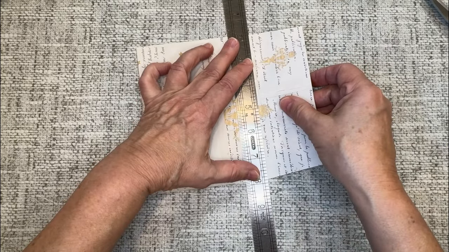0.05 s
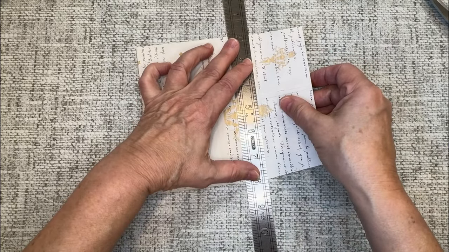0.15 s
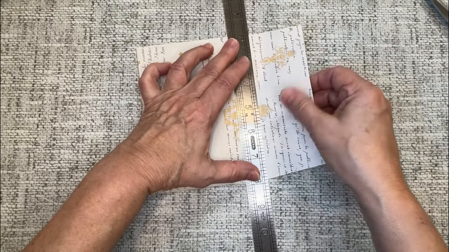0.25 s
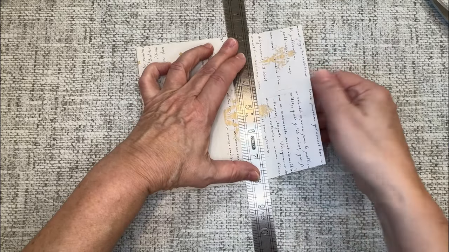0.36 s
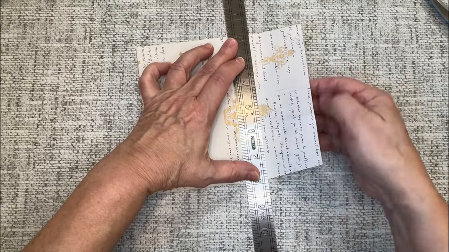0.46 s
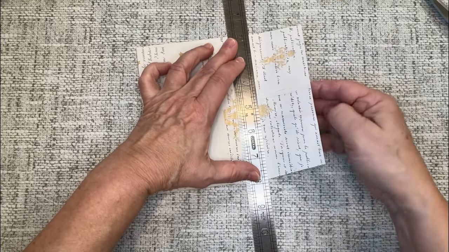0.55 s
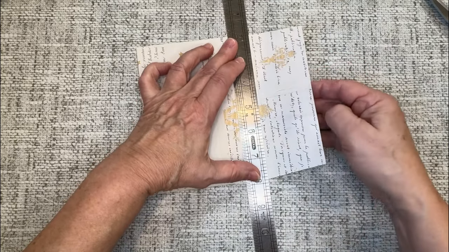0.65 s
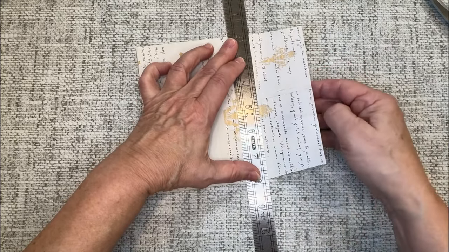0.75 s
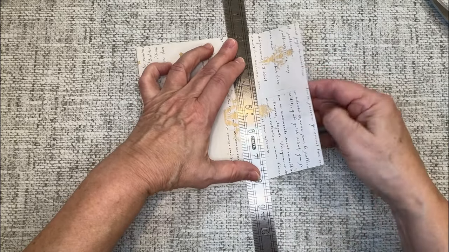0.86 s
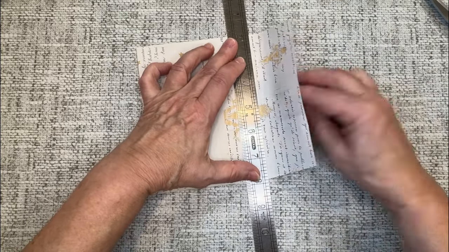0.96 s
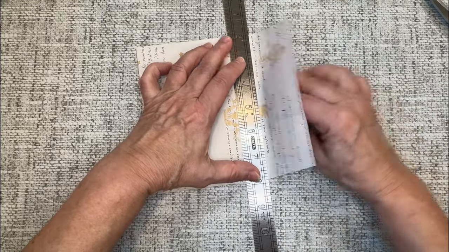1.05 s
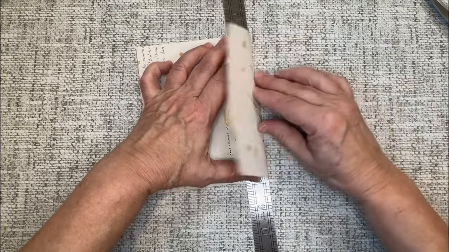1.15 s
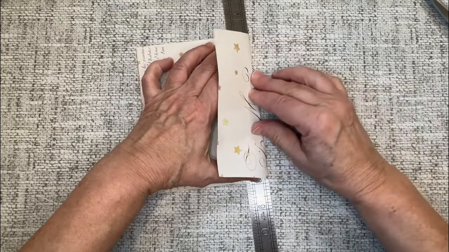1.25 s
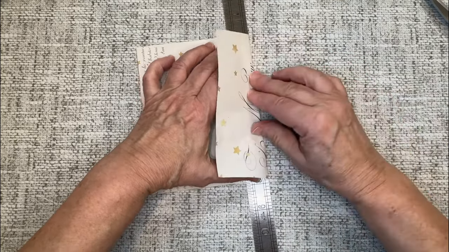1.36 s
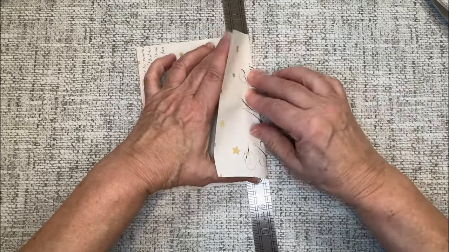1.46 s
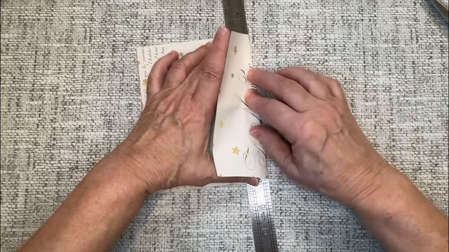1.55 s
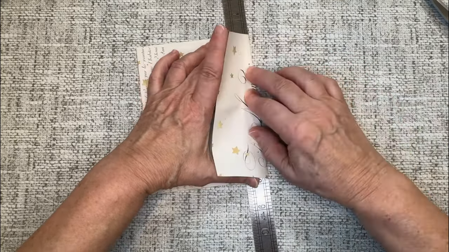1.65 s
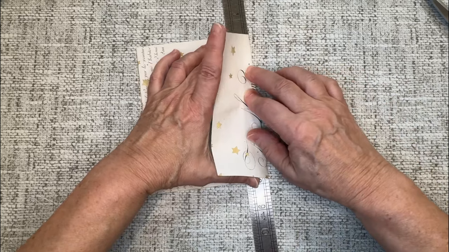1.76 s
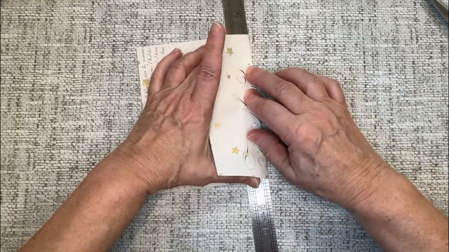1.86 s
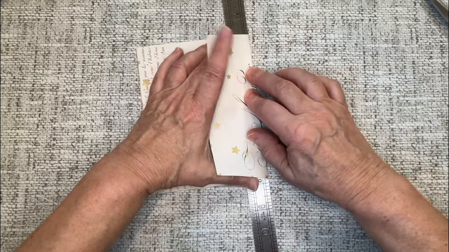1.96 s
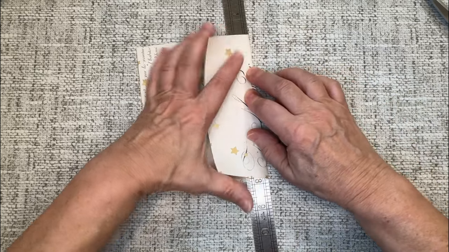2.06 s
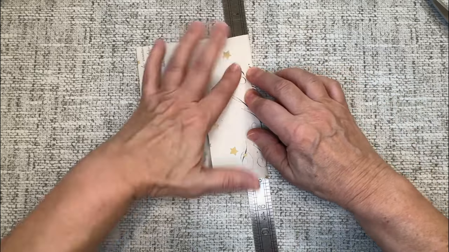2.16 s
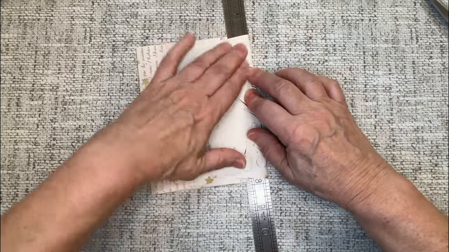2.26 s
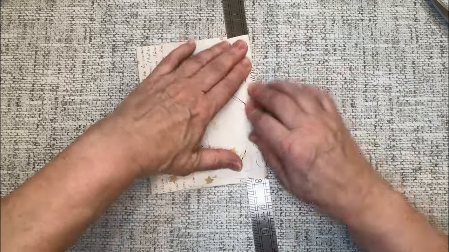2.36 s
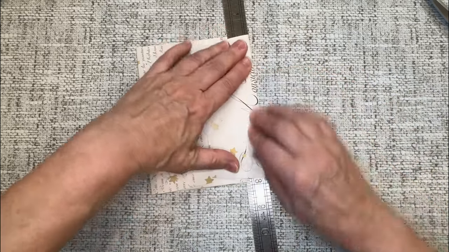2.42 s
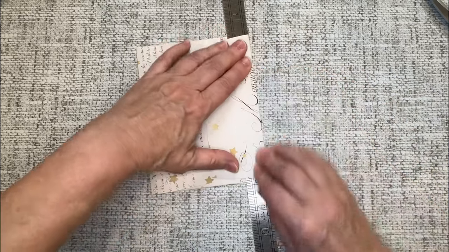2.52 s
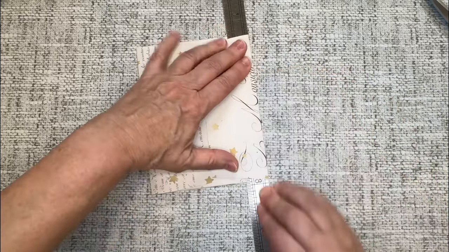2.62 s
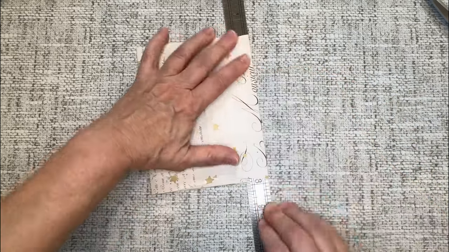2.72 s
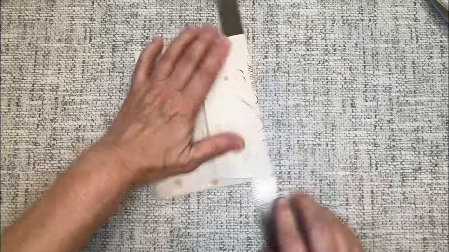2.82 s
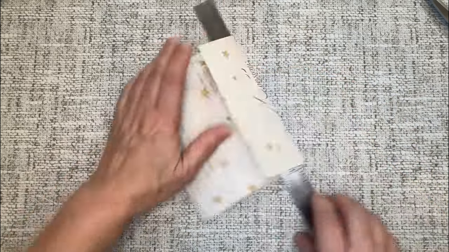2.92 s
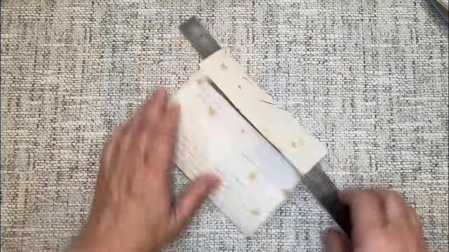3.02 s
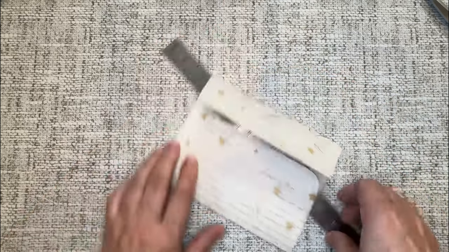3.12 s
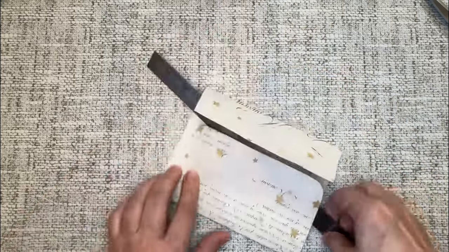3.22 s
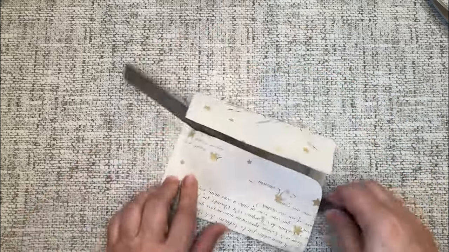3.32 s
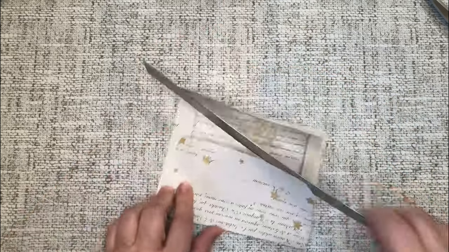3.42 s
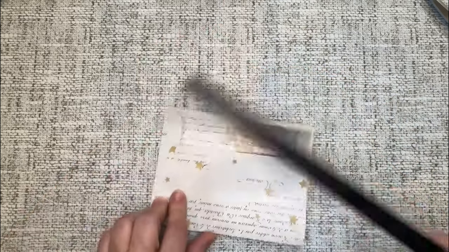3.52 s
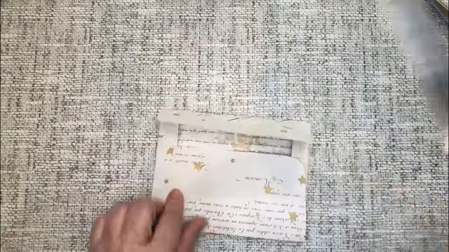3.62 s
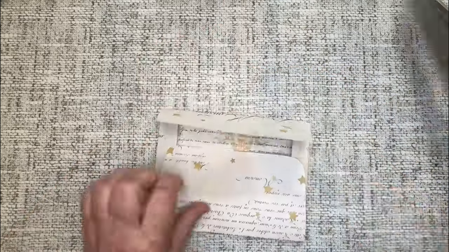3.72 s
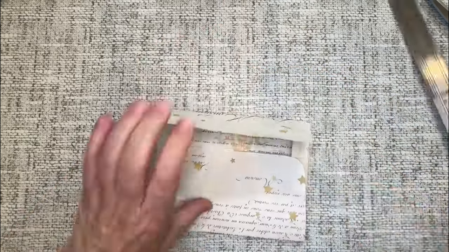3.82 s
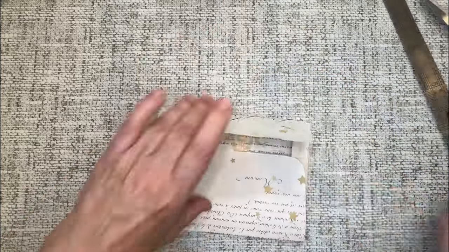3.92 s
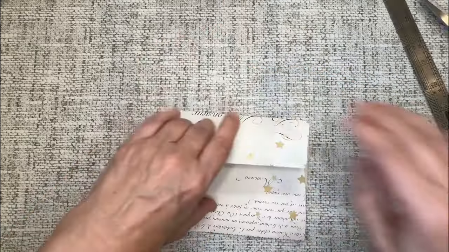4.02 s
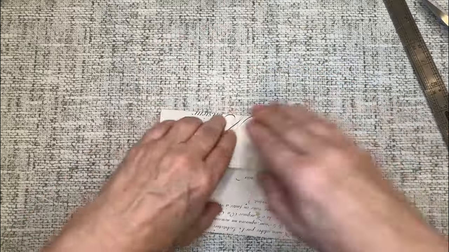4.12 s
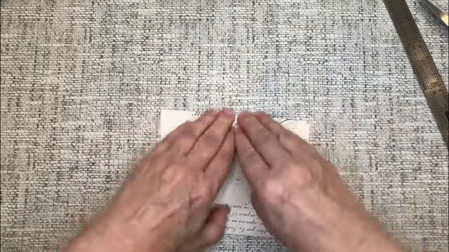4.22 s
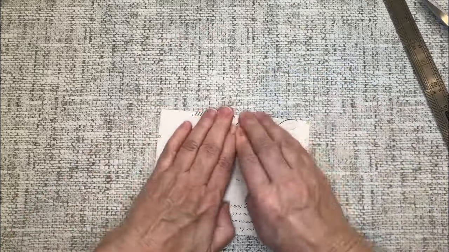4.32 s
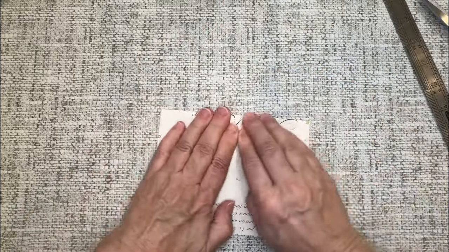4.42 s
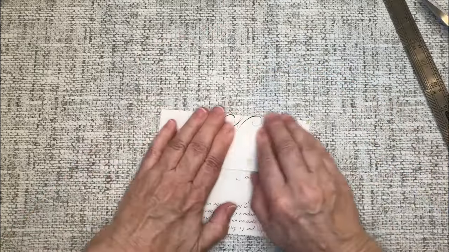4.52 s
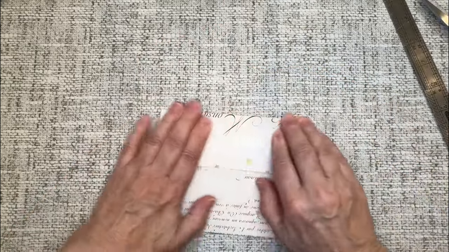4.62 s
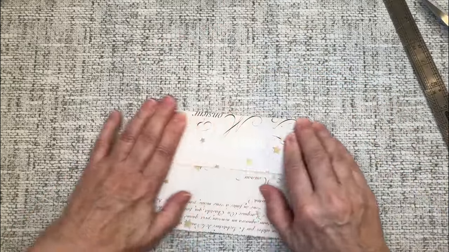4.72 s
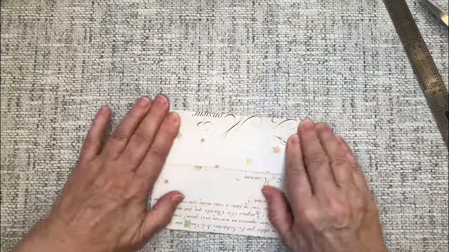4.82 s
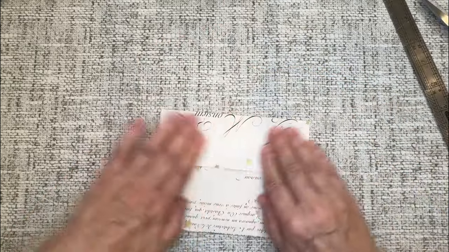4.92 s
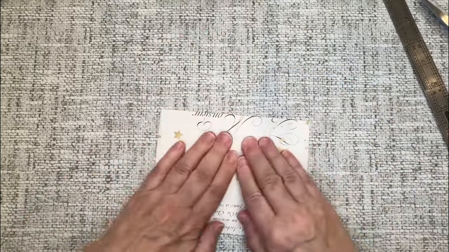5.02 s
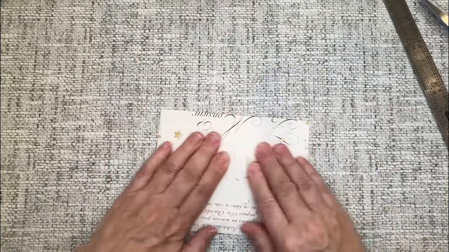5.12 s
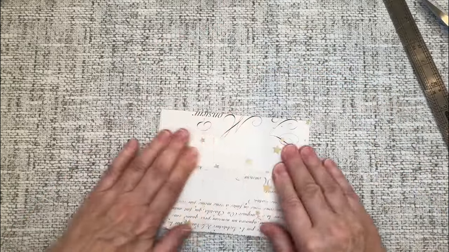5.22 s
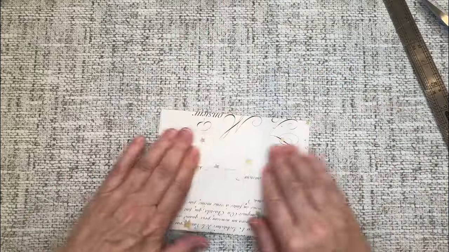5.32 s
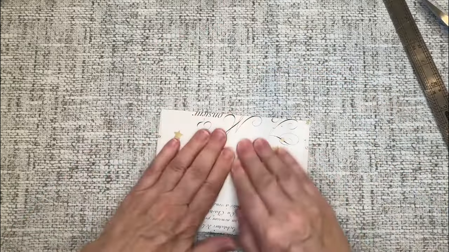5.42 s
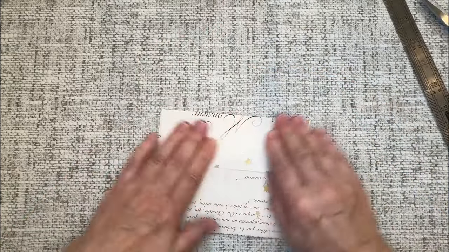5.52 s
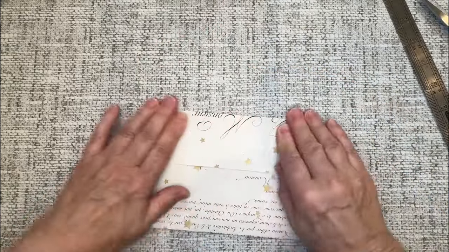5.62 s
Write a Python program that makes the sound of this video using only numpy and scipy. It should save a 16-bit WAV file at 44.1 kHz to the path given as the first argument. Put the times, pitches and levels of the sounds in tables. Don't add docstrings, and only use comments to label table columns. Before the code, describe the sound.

Stiff paper is folded and creased by hand on a cloth-covered table, with crisp snaps, then a metal ruler clatters down and smoothing follows.

```python
import sys
import numpy as np
from scipy import signal
from scipy.fft import rfft, irfft, next_fast_len
from scipy.io import wavfile
from scipy.ndimage import uniform_filter1d

SR = 44100
rng = np.random.default_rng(int(sys.argv[2]) if len(sys.argv) > 2 else 0)


def transcribe(signal):
    frames = np.atleast_2d(signal).T
    limited = np.clip(frames, -1, 1)
    pcm = np.round(limited * 32767).astype(np.int16)
    wavfile.write(sys.argv[1], SR, pcm)


def invert_db(level):
    return 10 ** (np.asarray(level, dtype=float) / 20)


N = 250207

# [peak t/s, skin hiss level/dB, rise t/s, fall t/s, paper surface over hiss level/dB]
FINGER_STROKES = [(.2, -54.5, 0.016, 0.26, -2.5), (.42, -55.5, 0.15, 0.23, -0.5),
                  (0.574, -61.5, 0.23, 0.06, 3), (.84, -66, 0.071, 0.044, 2),
                  (.979, -43, 0.063, 0.089, -1.5), (1.07, -47, 0.59, 0.068, -6),
                  (1.19, -56.5, 0.18, 0.045, -1), (1.385, -43.5, 0.028, 0.24, -14.5),
                  (1.449, -41, 0.12, 0.074, -5), (1.53, -75, 0.13, 0.14, -13),
                  (1.6, -58, 0.054, 0.044, 0.5), (1.731, -49, 0.11, 0.15, -8.5),
                  (1.823, -31.5, 0.017, 0.018, -14), (1.952, -47.5, .02, 0.098, -7),
                  (2.08, -39, 0.13, 0.02, -13), (2.229, -40.5, 0.0063, 0.061, -11),
                  (2.4, -48.5, 0.15, 0.51, -14.5), (2.772, -49.5, 0.46, 0.7, -12),
                  (2.849, -47, 0.14, 0.41, -3), (3.055, -40.5, 0.05, 0.23, -5), (3.1, -44.5, .1, 0.1, 3),
                     (3.14, -42.5, 0.099, 0.056, 2), (3.253, -45.5, 0.026, 0.073, -2.5),
                     (3.29, -48.5, 0.079, 0.19, -2), (3.459, -49, 0.26, 0.12, 1),
                     (3.67, -57.5, 0.0088, 0.16, -1), (3.898, -26, 0.023, 0.033, -4),
                     (3.93, -46, 0.094, 0.12, 1), (4.168, -53, 0.13, 0.35, 0),
                     (4.58, -45, 0.24, 0.53, -11.5), (4.708, -53, 0.13, 0.65, -2.5),
                     (4.878, -43, 0.014, 0.19, -24), (4.977, -39.5, 0.14, 0.066, -5.5),
                     (5.181, -47.5, 0.25, 0.18, -5), (5.37, -43, 0.082, 0.13, -16),
                     (5.52, -43.5, 0.29, 0.41, -10)]
# [peak t/s, flexing level/dB, rise t/s, fall t/s, table drag over flexing level/dB]
BENDS = [(0.2, -53.5, 0.023, 0.2, -18), (.56, -64, 0.38, 1.7, -10), (.83, -67, 0.45, 0.98, -21),
         (.979, -61, 0.17, 1.1, -33), (1.07, -53, 0.078, 0.079, -1), (1.22, -51, 0.051, 0.16, -0.5),
         (1.442, -46, 0.23, 0.17, -4.5), (1.732, -53, 0.56, 0.19, -7), (1.82, -41.5, 0.01, 0.1, -39),
         (2.084, -50.5, 0.25, 0.36, -28), (2.23, -70.5, 0.026, 0.22, 13.5), (2.7, -63, 2, 0.48, -4.5),
         (2.847, -55, 0.067, 3.1, -7.5), (3.09, -52, 0.25, 0.059, -7), (3.29, -52.5, 0.34, 0.57, -35),
         (3.483, -44.5, 0.058, 0.079, -21), (3.568, -66, 0.41, 0.058, 11.5), (3.68, -60.5, 0.041, 0.32, -9),
         (3.9, -42.5, 0.034, 0.18, -4.5), (4.2, -53.5, 0.11, 0.19, -4), (4.6, -64.5, .5, 0.5, -24),
         (4.962, -53.5, 0.063, 0.18, -11.5), (5.178, -64.5, 0.2, 0.36, -44), (5.46, -56.5, 0.07, 0.23, -16),
         (5.53, -59.5, 0.29, 4.4, -2.5)]
# [still from t/s, until t/s, depth level/dB]
PAUSES = [(0.633, 0.777, -26), (1.65, 1.67, -5.5), (1.877, 1.924, -3.5), (2.16, 2.196, -18),
          (4.798, 4.84, -20), (5.035, 5.035, -8), (5.26, 5.284, -9)]
# [f/Hz, level/dB]
HISS_COLOUR = [(6000, -11), (7400, -9), (8200, -5.5), (9500, -1.5), (11000, -1.5), (12000, -0.5),
               (12900, -2), (13500, -14), (14600, -5), (15600, -13), (16000, -69.5)]
# [f/Hz, level/dB]
SURFACE_COLOUR = [(2200, -17.5), (3100, -5.5), (4300, 1.5), (5300, 0), (6000, 0), (7200, -3.5), (8500, -10)]
# [f/Hz, level/dB]
SHEET_COLOUR = [(700, -17.5), (1080, -8), (1350, -5.5), (1600, -1.5), (1950, -2), (2450, -3.5), (2800, -2),
                (3300, -4.5), (4500, -21)]
# [f/Hz, level/dB]
DRAG_COLOUR = [(80, -24.5), (160, -10.5), (300, 2), (550, -0.5), (900, 0.5), (1400, -2)]
BEND_SURFACE_DB = -5.5
SINK_S, RESUME_S = 0.05, 0.036
PATCHY_DB, PATCH_RATE = 2.0, 11

# [peak t/s, level/dB, rise
# t/s, fall t/s, pitch f/Hz]
AIR_POCKETS = [(.776, -58, 0.0067, 0.022, 1160), (.86, -63.5, .08, .04, 2250), (.85, -57, .08, 0.046, 3900),
               (.93, -56.5, 0.041, 0.12, 2050), (.96, -55, .08, .06, 4400), (.98, -60, .1, .08, 6500),
               (1.05, -46, 0.11, 0.098, 4250), (1.06, -54.5, 0.12, 0.07, 1650),
               (1.195, -56, .1, 0.045, 2660), (1.5, -50.5, 0.11, 0.25, 2420),
               (1.56, -58.5, .15, 0.16, 1350), (1.72, -53.5, .12, 0.16, 1360),
               (1.72, -52.5, 0.092, 0.18, 2580), (1.86, -52.5, .04, 0.12, 1300),
               (2.1, -52, 0.024, 0.12, 1330), (3.13, -54, .12, .06, 4820), (3.31, -49.5, .1, .08, 2300),
               (3.915, -51, .03, 0.049, 293), (4.33, -58.5, .05, 0.076, 1390),
               (4.435, -60, .008, 0.018, 1200), (4.88, -69, 0.0071, .02, 746),
               (4.965, -60.5, .06, 0.07, 2300), (5.5, -59.5, .15, .3, 1900), (5.17, -67, .15, 0.094, 4300),
               (1.185, -53, .02, 0.033, 555), (1.345, -42, 0.0067, .018, 570),
               (1.396, -45, .005, .015, 2770), (1.71, -56, .01, .03, 404), (2.13, -61, 0.059, 0.086, 398),
               (3.201, -50, .005, .01, 2200), (3.755, -55, .01, 0.065, 820), (5.332, -44, .006, .008, 5060),
               (5.379, -47, .005, .04, 1730)]
POCKET_WIDTH = 0.17

# [t/s, peak level/dB, bright part level/dB, ring f/Hz, relative length]
BUCKLES = [(.189, -49, -2, 2200, 1.3), (.953, -40, 1, 4350, 0.86), (.985, -32, -19, 1960, 0.47),
           (.9906, -26.5, -9, 2300, 0.69), (1.043, -35, -15, 3380, 0.94), (1.2143, -11.5, -6, 2760, 0.7),
           (1.3425, -23.5, -25, 1490, 1.34), (1.346, -23, -30, 1260, 0.75), (1.3945, -26, -12.5, 1350, 0.7),
           (1.4466, -15, -14, 2430, 1.1), (1.7993, -41.5, -11, 1300, 1), (1.8243, -22, -1.3, 2700, 1.42),
           (1.831, -22, -15, 2200, 0.7), (2.0325, -31.5, 0, 2150, 0.73), (2.225, -35.5, -6, 2010, 0.96),
           (2.237, -36, -12, 995, 1.2), (2.317, -61, -8, 1150, 0.76), (2.808, -44.5, 1, 2680, 2.1),
           (2.842, -37.5, -6, 2770, 0.9), (3.028, -39, -3, 2360, 0.98), (3.042, -30, -4.5, 1760, 1.24),
           (3.075, -35, -8, 2520, 1), (3.2, -31, -9, 2370, 0.37), (3.234, -45, -4, 5900, .7),
           (3.257, -37.5, -2, 1920, 1.2), (3.296, -37, 1, 1980, 1.6), (3.493, -28.5, -21, 2230, 1.15),
           (3.4975, -31, -27, 1930, 1.1), (3.503, -31, -25, 1620, 1.1), (3.669, -48.5, 1, 1480, 1),
           (4.18, -32.5, -11, 2900, 2.8), (4.189, -25.5, -4, 1237, 1.08), (4.864, -55, 4, 3000, 0.89),
           (5.33, -43.5, 14.5, 4900, 1.4), (5.333, -38.5, 16.5, 3000, 0.71), (5.3787, -33, 2.5, 3200, 0.5)]
FINGER_TAPS = [(.774, -48.5, -41, 600, 1.1), (1.71, -37, -25, 407, 1.6), (2.077, -26, -2, 1923, 1.2),
               (2.212, -47, 3, 895, 0.79), (2.43, -44, -22, 680, 0.59), (2.697, -40, -6.5, 1890, 1.03),
               (2.929, -37.5, -5, 635, 1.4), (3.37, -41.5, -1, 1880, 1.8), (3.454, -37, -18, 374, 0.61),
               (3.47, -47, -17, 690, 1), (3.523, -27.5, -18, 475, 1.35), (3.535, -38, -21, 930, 0.61),
               (3.55, -59, -21, 500, 1.1), (3.905, -29.5, -33.5, 333, 2), (3.98, -37.5, -30, 337, 1),
               (3.995, -37, -30, 650, 1.15), (4.1, -44.5, -14, 610, 2.5), (4.009, -37.5, 3.5, 1630, 1.5),
               (5.517, -34, -14, 1330, .45)]
# [f/Hz, level/dB]
SNAP_COLOUR = [(500, -5), (1050, -1.5), (1300, 5), (1650, 3), (2000, 3), (2400, 4), (3000, 3), (4300, -1),
               (6000, -15.5)]
# [f/Hz, level/dB]
CRACK_COLOUR = [(3500, -7), (5000, 3), (8000, -2.5), (12000, -3), (15600, -28), (16500, -92.5)]
# [f/Hz, level/dB]
PUSH_COLOUR = [(120, -22.5), (210, -4), (290, -14.5), (420, 0), (580, -1.5), (800, -3), (1200, -15)]
SNAP_PUSH_DB, SNAP_T60_S = -24, 0.025
TAP_PUSH_DB, TAP_T60_S = -14, 0.029
LEAD_S = .012

# [t/s, peak level/dB, crack level/dB, clack level/dB]
RULER_BLOWS = [(3.7459, -20, -7, -3.5), (3.758, -35.5, -32, -4), (3.7974, -30, -8.5, -2),
               (3.8644, -25, -10, 0.5), (3.8685, -26, -4, -4), (3.872, -19, -33, -18),
               (3.878, -25, -33, -1), (3.8813, -19, -33, -9), (3.8875, -30, -28, 0),
               (3.8939, -17.5, -1.5, -12), (3.8977, -16.5, -19, -10), (3.9, -20.5, -9, -10),
               (3.9055, -18.5, -4.5, -16), (3.9098, -19, -25, -5), (3.9133, -25, -18, -15),
               (3.921, -32, -25, -11), (3.928, -37, -22, 5)]
# [f/Hz, level/dB, t60 t/s]
RULER_MODES = [(1250, -6, .2), (1340, -6, .2), (1470, -8, .15), (1538, -7, .25), (1670, -14, .16),
               (1770, -5, .16), (1842, -9, .2), (2165, -16, .2), (5674, -4, .16), (5717, -4, .2),
               (5798, 0, .25), (5885, -2, .28), (6045, -5, .22), (6171, -9, .2), (6350, -6, .27),
               (6388, -5, .2), (6616, -11, .19), (6794, -11, .25), (6940, -9, .14), (7095, -11, .2),
               (7435, -12, .2)]
# [f/Hz, level/dB]
CLACK_COLOUR = [(700, -14), (1150, -7.5), (1500, -1), (1850, 0.5), (2300, -1.5), (3500, -8)]
RATTLE_T60_S = 0.015

# [t/s, peak level/dB, pitch f/Hz]
LANDINGS = [(0.208, -57, 75.4), (1.063, -68, 68), (1.11, -57, 111), (1.205, -65, 64), (1.343, -50, 201),
            (1.442, -54, 127), (1.83, -61, 105), (2.073, -60, 104), (2.249, -56, 69), (2.691, -51.5, 190),
            (2.79, -55, 126), (2.922, -57, 124), (3.116, -59, 64.6), (3.748, -65, 131), (3.8, -71, 151),
            (3.869, -59, 129), (3.898, -48.5, 108.5), (3.905, -44.5, 183), (4.99, -66, 75), (5.38, -68, 80)]
THUD_T60_S = 0.14

# [f/Hz, level/dB]
ROOM_COLOUR = [(100, -0.5), (1500, 13), (3000, 8), (7000, 10), (9000, 1), (16000, -41)]
ROOM_T60_S, ROOM_GAP_S, ROOM_DB = .3, 0.0095, -14.5

# [peak t/s, level/dB, rise t/s, fall t/s]
ARM_LEANS = [(.27, -69.5, 0.73, 1.9), (1.07, -60.5, 0.13, 0.5), (1.48, -62, 1.1, 0.083),
             (1.72, -67.5, 0.4, 0.19), (1.9, -75, .15, 0.16), (2.09, -73, 0.085, 0.13),
             (2.26, -65, 0.038, 0.25), (2.78, -62.5, 0.14, 0.26), (3.14, -64, 1, 1),
             (3.93, -55.5, 0.052, 0.079), (4.22, -73, 0.12, 0.5), (4.5, -75, .1, 0.39),
             (4.99, -75, 0.25, 0.53), (5.37, -68, 0.03, 0.14)]
# [f/Hz, level/dB]
TABLE_COLOUR = [(25, -31.5), (45, -16.5), (60, 1.5), (90, -10.5), (120, -4), (155, -10), (200, -5.5),
                (260, -11.5)]
# [f/Hz, level per Hz/dB]
VENT_COLOUR = [(82, -34), (140, -4), (355, -5.5), (595, -18), (1150, -4.5), (2290, -13), (3600, -17.5),
               (6960, -29), (12600, -46), (15700, -52), (16100, -70)]
# [f/Hz, level/dB]
MAINS_LINES = [(60, -94.5), (120, -86.5)]
VENT_DB = -75

# [f/Hz, likeness 0-1, right leads by/radians, left minus right level/dB]
PORTS = [(30, .68, 0, 4), (90, .45, 0, 0), (250, .55, 0, 3), (700, .2, -.3, 2), (1700, .2, -.4, 0),
         (2400, .7, -.7, 0), (3100, .88, -2.8, 0), (4200, .89, -3.14, 0), (5200, .7, -2.9, 0),
         (5700, .3, -4, 0), (7000, .3, -3.58, 1), (7800, .88, -3.28, 0), (8600, .995, -3.14, 0),
         (9700, .992, -3.08, 0), (10600, .975, -2.95, 0), (11300, .9, -2.5, 0), (12500, .86, -1.88, 0),
         (13800, .65, -1, 0), (15000, .9, -.4, 0), (16500, .95, 0, 0)]
# [t/s, share 0-1 in mid band, in top band]
SPREAD = [(0, .8, .8), (.17, .8, .8), (.2, .75, .2), (.6, .75, .2), (.64, .8, .6), (.77, .8, .8),
          (.8, .75, .22), (1.15, .75, .22), (1.3, .75, .42), (2.25, .75, .38), (2.4, .3, .22),
          (2.78, .08, .22), (2.9, .75, .14), (3.6, .75, .06), (3.75, .75, .45), (4.2, .75, .35),
          (4.35, .42, .08), (5.67, .3, .1)]
# [t/s, left minus right level/dB]
SIDE_LEAN = [(0, 1), (3.7, 0), (3.95, 0.5), (4.1, 1.7), (4.9, .5), (5.3, 3), (5.45, 2), (5.67, 1.5)]
SPLIT_HZ = (2600, 6500)
LIMIT = .62


def shape(table, size, column=1):
    rows = np.array(table, float)
    hz = np.fft.rfftfreq(size, 1 / SR) + 1
    return np.interp(np.log(hz), np.log(rows[:, 0]), rows[:, column])


def colour(x, table):
    size = 2 * next_fast_len(x.shape[-1] // 2 + 1)
    below, above = (table[0][0] / 2, -70), (table[-1][0] * 2, -70)
    gain = invert_db(shape([below] + list(table) + [above], size))
    cepstrum = irfft(np.log(gain), size)
    cepstrum[1:size // 2] *= 2
    cepstrum[size // 2 + 1:] = 0
    response = np.exp(rfft(cepstrum)) / np.sqrt(np.mean(gain ** 2))
    return irfft(rfft(x, size) * response, size)[..., :x.shape[-1]]


def walk(rate):
    k = int(SR / rate)
    held = np.repeat(rng.standard_normal(N // k + 1), k)
    return 1.3 * uniform_filter1d(uniform_filter1d(held, k), k)[:N]


def swells(rows):
    s, db, rise, fall = np.array(rows).T[:4, :, None]
    late = np.arange(0, N + 64, 64) / SR - s
    climb = -late / np.maximum(rise, .005)
    decay = late / np.maximum(fall, .005)
    return invert_db(db - 20 * np.where(late < 0, climb, decay))


def together(gains, db=0):
    shifted = gains * invert_db(np.reshape(db, (-1, 1)))
    total = np.sqrt(np.sum(shifted ** 2, axis=0))
    return np.interp(np.arange(N) / 64, np.arange(len(total)), total)


def burst(t60, rise):
    t = np.arange(4608) / SR - LEAD_S
    envelope = np.clip(t / rise, 0, 1) * 1000. ** (-t / max(t60, .002))
    return rng.standard_normal((2, len(t))) * envelope


def add(out, s, x):
    i = int(s * SR)
    out[:, i:i + x.shape[1]] += x[:, :N - i]


def slips(table, scatter_db, flicker_db, rate):
    scatter = scatter_db * np.minimum(rng.exponential(1, N), 6)
    size = invert_db(scatter + flicker_db * walk(rate))
    return colour(rng.standard_normal((2, N)) * size / np.sqrt(np.mean(size ** 2)), table)


def patches(x, count):
    size = next_fast_len(N)
    log_hz = np.log(np.fft.rfftfreq(size, 1 / SR) + 1)
    place = np.interp(log_hz, np.log([500, 16000]), [0, count - 1])
    spectrum = rfft(x, size)
    out = np.zeros((2, N))
    for k in range(count):
        band = irfft(spectrum * np.clip(1 - abs(place - k), 0, 1), size)[:, :N]
        out += invert_db(PATCHY_DB * walk(PATCH_RATE)) * band
    return out


def hand_grip():
    t = np.arange(N) / SR
    grip = invert_db(1.3 * walk(35))
    for still, until, db in PAUSES:
        corners = [still - SINK_S, still, until, until + RESUME_S]
        grip = grip * invert_db(np.interp(t, corners, [0, 0.36 * db, db, 0]))
    return grip


def rubbing():
    rows = FINGER_STROKES
    strokes, bends = swells(rows), swells(BENDS)
    hiss, sheet = together(strokes), together(bends)
    drag = together(bends, np.array(BENDS)[:, -1])
    stroked = together(strokes, np.array(rows)[:, -1])
    surface = np.hypot(stroked, invert_db(BEND_SURFACE_DB) * sheet)
    fine = hiss * slips(HISS_COLOUR, scatter_db=.8, flicker_db=.9, rate=60)
    fine += surface * slips(SURFACE_COLOUR, scatter_db=2.9, flicker_db=1.2, rate=50)
    coarse = sheet * slips(SHEET_COLOUR, scatter_db=3.7, flicker_db=1.6, rate=45)
    coarse += drag * slips(DRAG_COLOUR, scatter_db=2.5, flicker_db=2.8, rate=30)
    return hand_grip() * patches(fine + coarse, count=12)


def pockets():
    out = np.zeros((2, N))
    grain = rng.standard_normal((2, N)) * invert_db(2.3 * np.minimum(rng.exponential(1, N), 6) - 4)
    for row in AIR_POCKETS:
        hz = row[-1]
        edges = hz * np.array([1 - POCKET_WIDTH / 2, 1 + POCKET_WIDTH / 2])
        band = signal.sosfilt(signal.butter(2, edges, "band", fs=SR, output="sos"), grain)
        out += together(swells([row])) * band * np.sqrt(SR / (2 * hz * POCKET_WIDTH))
    return out


def snaps(rows, low_db, usual_t60):
    out = np.zeros((2, N))
    for s, db, top_db, hz, length in rows:
        t60, length = usual_t60 * length, max(length, .2)
        crack = invert_db(top_db + 5.5) * colour(burst(0.61 * t60, rise=0.000097 * length ** 2), CRACK_COLOUR)
        push = invert_db(low_db + 8.0) * colour(burst(1.45 * t60, rise=0.0021), PUSH_COLOUR)
        peak = [(hz / 1.172, -18), (hz, 0), (hz * 1.16, -18)]
        ring = invert_db(-4.5) * colour(burst(1.22 * t60, rise=0.00086 * length ** 2), peak)
        body = invert_db(1.0) * min(hz / 1400, 1) ** 2 * colour(burst(t60, rise=0.0012 * length ** 2), SNAP_COLOUR)
        add(out, s - LEAD_S, invert_db(db - 5.5) * (body + ring + crack + push))
    return out


def ruler():
    out, t = np.zeros((2, N)), np.arange(int(.4 * SR)) / SR
    hz, mode_db, mode_t60 = np.array(RULER_MODES).T[:, :, None]
    modes = invert_db(mode_db) * np.sin(2 * np.pi * hz * t) * 1000. ** (-t / mode_t60)
    crack_colour = [(6000, 4.5), (7500, -2.0), (11000, -2.0), (15500, -12.0), (16900, -66)]
    rattle_colour = [(3000, -18), (4000, -3.5), (5400, -4.0), (5900, 9.5), (6500, -3.5), (7300, -5.5), (8000, -5)]
    t60, count = RATTLE_T60_S, len(RULER_MODES)
    for s, db, crack_db, clack_db in RULER_BLOWS:
        share = rng.standard_normal((1, count)) + 0.5 * rng.standard_normal((2, count))
        add(out, s, invert_db(db - 24.5) * share @ modes)
        crack = invert_db(crack_db + 16.0) * colour(burst(.5 * t60, rise=0.00038), crack_colour)
        clack = invert_db(clack_db) * colour(burst(1.63 * t60, rise=0.00046), CLACK_COLOUR)
        rattle = invert_db(2.0) * colour(burst(t60, rise=0.00017), rattle_colour)
        add(out, s - LEAD_S, invert_db(db - 3.0) * (crack + clack + rattle))
    return out


def thuds():
    out, t = np.zeros((2, N)), np.arange(int(.4 * SR)) / SR
    for s, db, hz in LANDINGS:
        envelope = np.minimum(t / 0.0084, 1) * 1000. ** (-t / THUD_T60_S)
        ring = np.sin(2 * np.pi * hz * t) * envelope
        add(out, s, invert_db(db) * np.array([ring, ring]))
    return out


def walls(hits):
    t = np.arange(int(.5 * SR)) / SR
    tail = colour(rng.standard_normal((2, len(t))), ROOM_COLOUR)
    tail *= 1000. ** (-t / ROOM_T60_S) * (t > ROOM_GAP_S)
    tail *= invert_db(ROOM_DB) / np.sqrt(np.sum(tail ** 2, axis=1, keepdims=True))
    return signal.fftconvolve(hits, tail, axes=1)[:, :N]


def table_rumble():
    return together(swells(ARM_LEANS)) * colour(rng.standard_normal((2, N)), TABLE_COLOUR)


def hum():
    t = np.arange(N) / SR
    lines = sum(invert_db(db + 1.8 * walk(4.8)) * np.sin(2 * np.pi * hz * t) for hz, db in MAINS_LINES)
    level = invert_db(VENT_DB + 1.5 + 0.39 * walk(1.0))
    return level * colour(rng.standard_normal((2, N)), VENT_COLOUR) + lines


def scene():
    hits = snaps(BUCKLES, SNAP_PUSH_DB, SNAP_T60_S) + snaps(FINGER_TAPS, TAP_PUSH_DB, TAP_T60_S)
    hits += ruler() + thuds()
    return rubbing() + pockets() + hits + walls(hits) + table_rumble() + hum()


def band_limit(x):
    return signal.sosfilt(signal.butter(12, 17130, fs=SR, output="sos"), x)


def record(dry):
    t, size = np.arange(N) / SR, next_fast_len(N)
    first, second = rfft(dry, size)
    alike, tilt = shape(PORTS, size), invert_db(shape(PORTS, size, column=3) / 2)
    turned = alike * np.exp(1j * shape(PORTS, size, column=2)) * first
    parts = np.array([turned, np.sqrt(1 - alike ** 2) * second, alike * second]) / tilt
    band = np.digitize(np.fft.rfftfreq(size, 1 / SR), SPLIT_HZ)
    s, middle, top = np.transpose(SPREAD)
    right = 0
    for k, share in enumerate([0 * middle, middle, top]):
        twin, other, apart = irfft(parts * (band == k), size)[:, :N]
        spread = np.clip(np.interp(t, s, share) * invert_db(2.5 * walk(12)), 0, .9)
        right = right + np.sqrt(1 - spread ** 2) * twin + (1 - spread / 2) * other + spread * apart
    ports = np.array([irfft(first * tilt, size)[:N], right])
    ports *= invert_db(np.interp(t, *np.transpose(SIDE_LEAN)) * np.array([[.5], [-.5]]))
    return band_limit(LIMIT * np.tanh(ports / LIMIT))


dry = scene()
out = record(dry)
transcribe(out)
```